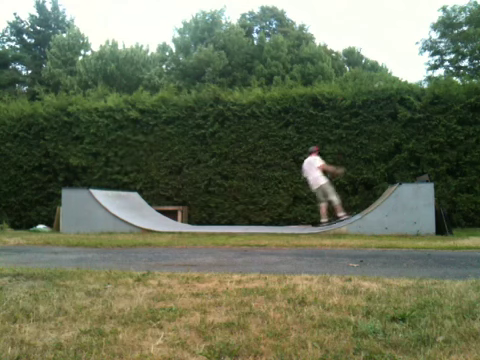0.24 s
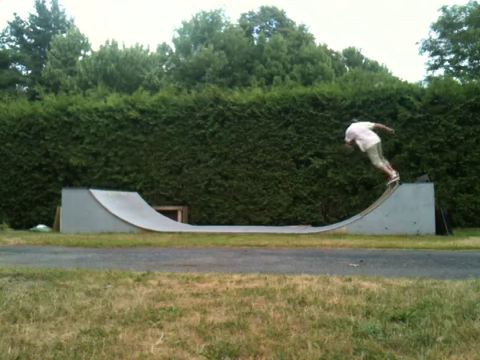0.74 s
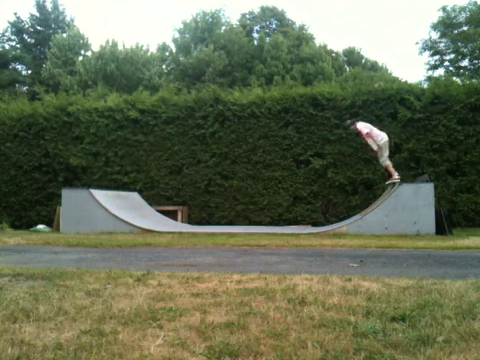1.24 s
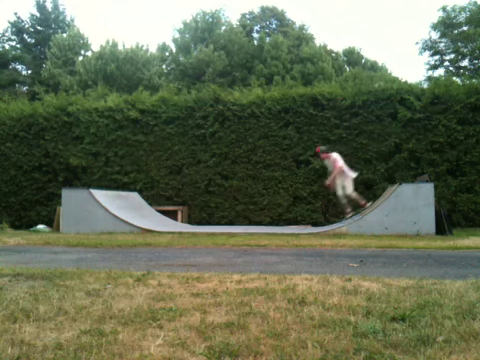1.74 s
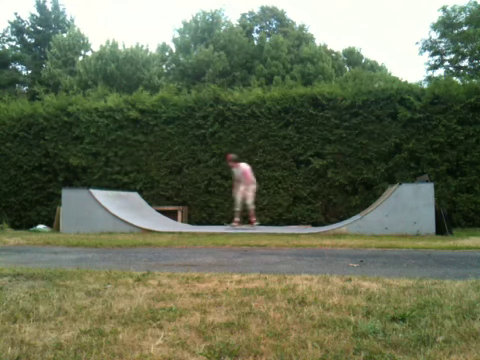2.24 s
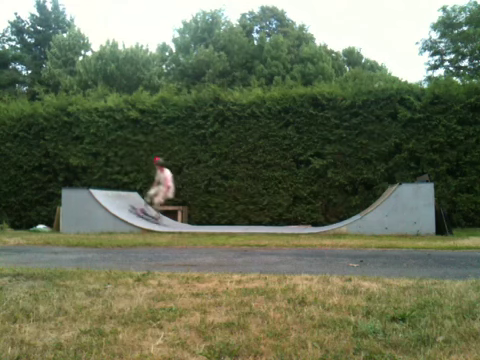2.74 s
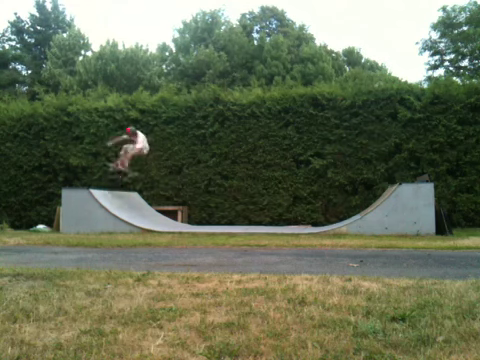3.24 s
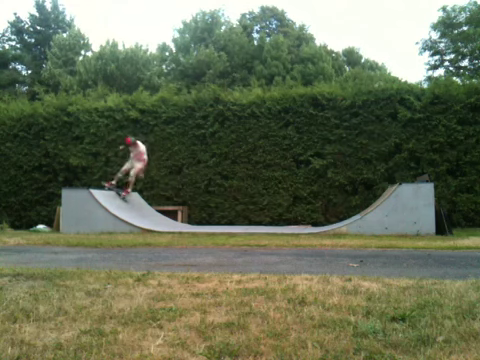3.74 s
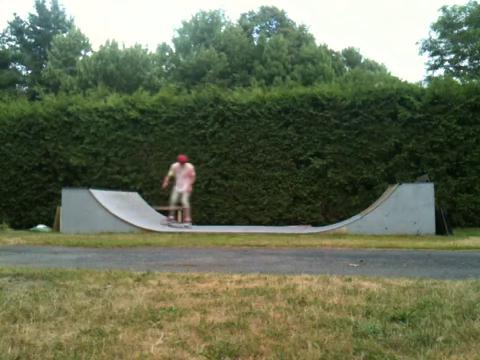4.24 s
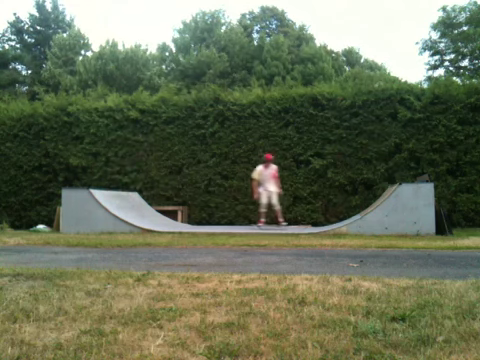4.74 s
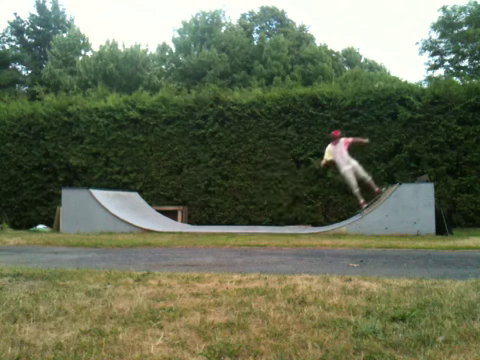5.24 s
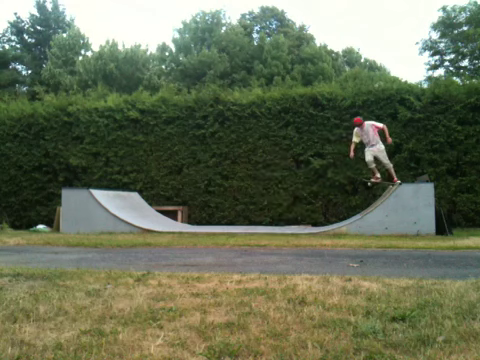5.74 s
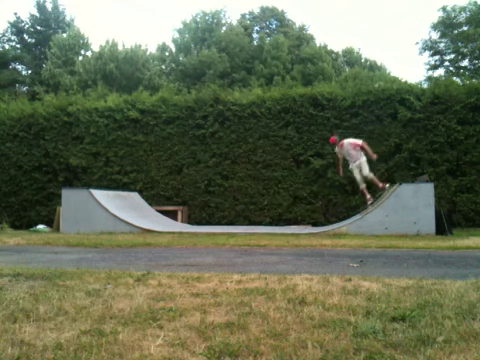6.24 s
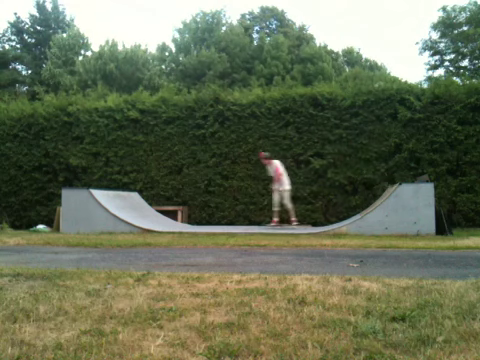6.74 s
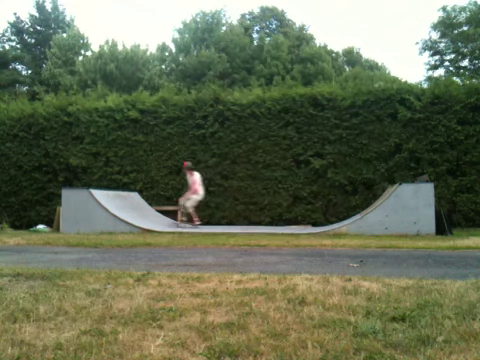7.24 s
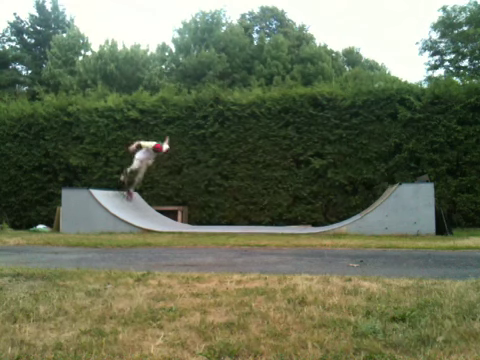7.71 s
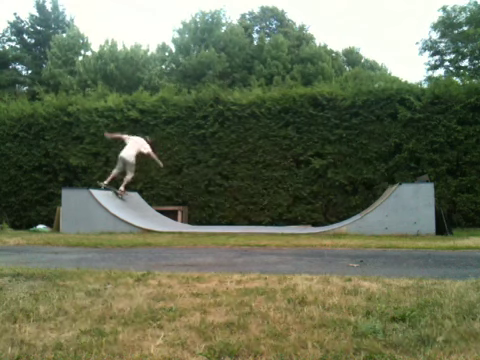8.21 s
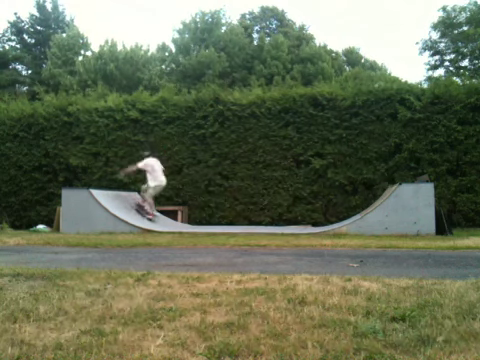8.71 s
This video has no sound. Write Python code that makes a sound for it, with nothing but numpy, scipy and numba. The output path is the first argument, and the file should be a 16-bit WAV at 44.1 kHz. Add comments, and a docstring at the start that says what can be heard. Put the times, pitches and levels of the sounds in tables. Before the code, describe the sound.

Heard from some way off in a garden, skateboard wheels rumble, hiss and thud over a hollow plywood ramp. Clacks at one lip give way to another run, then harder cracks, the loudest around four seconds. More rolling and knocks follow, a thin bird call, and a final long cluster of clattering blows. Faint traffic and leaves continue beneath.

```python
"""A skateboard rolls to and fro on a plywood mini ramp in a garden, heard from some way off.
First its wheels rumble the hollow ramp, hiss on its skin and thud over seams. Then blows clack at the lip.
More runs and blows follow, the hardest blow near 4 s; some scrape, and thin, flickering tones ring in places.
A bird calls with two thin whistles just after 6 s, then a last run ends in a long spell of blows from 7.5 s.
A hedge adds a faint tail to blows and scrapes; distant traffic and leaves are heard throughout."""
import sys
import numpy as np
from scipy import signal
from scipy.fft import rfft, irfft
from scipy.io import wavfile
from scipy.ndimage import uniform_filter1d
from numba import njit

SR = 44100
rng = np.random.default_rng(int(sys.argv[2]) if len(sys.argv) > 2 else 0)


def log_audio(samples):
    """Write samples as a 16-bit WAV file to the path given in sys.argv[1]."""
    # one column per channel
    frames = np.atleast_2d(samples).T
    # limit to full scale, then quantise
    limited = np.clip(frames, -1, 1)
    pcm = np.round(limited * 32767).astype(np.int16)
    wavfile.write(sys.argv[1], SR, pcm)


N = 395568
T = np.arange(N) / SR  # time [s]

# Runs from lip to lip: (foot of the curve going down [s], rumble [dB],
# on the flat between the curves [s], rumble [dB], foot of the curve going up [s], rumble [dB],
# wheel hiss there [dB], wheels leave the wood this long after the curve [s],
# hiss of wheels spinning free [dB]); the last row only fills the time after 8.56 s
RUNS = [(-0.6, -42, 0.093, -46.5, 0.55, -38, -54.5, 0.44, -69),
        (1.85, -39.5, 2.32, -50, 2.89, -39.5, -53, 0.24, -60),
        (4.259, -43, 4.76, -49.5, 5.17, -41, -56.5, 0.4, -64.5),
        (6.51, -43, 6.99, -47.5, 7.5, -42, -53.5, 0.39, -60.5), (8.8, -57, 7.1, -47, 14, -45, -57, .3, -67)]
# The board rocks on the lip: (time [s], rumble [dB], wheel hiss [dB])
LIP_ROCKS = [(3.77, -49, -63), (4.0, -66, -79), (8.29, -54.5, -63), (8.55, -55, -66)]
# Wheels cross a seam or rib of the ramp: (time [s], peak [dB], pitch of the panel [Hz])
SEAM_THUDS = [(0.291, -42, 188), (0.334, -38, 234), (0.416, -31, 263), (0.475, -40, 283), (0.491, -28, 261),
              (0.516, -32, 167), (0.577, -31, 170), (0.683, -40, 210), (0.764, -39, 175), (1.829, -34, 172),
              (1.874, -33, 186), (1.915, -30.5, 180), (1.949, -36, 159), (2.049, -35, 339),
              (2.164, -44, 198), (2.413, -41, 186), (2.766, -32, 151), (2.846, -29.5, 148),
              (2.879, -42, 183), (4.244, -33.5, 268), (4.323, -34, 217), (4.382, -36, 231),
              (4.634, -40, 154), (4.983, -38, 248), (5.043, -39, 215), (5.079, -36, 196), (5.133, -38, 231),
              (5.204, -34, 178), (5.259, -33, 242), (5.314, -34.5, 186.9), (5.348, -41, 194),
              (6.552, -36, 175), (7.369, -34.5, 202), (7.454, -33, 132), (7.549, -34, 248),
              (7.609, -35, 266)]
# Narrow flickering tones: a short steel ring after the blow near 0.93 s, then faint thin ones:
# (start [s], length [s], pitch [Hz], level [dB])
THIN_TONES = [(0.935, 0.09, 4800, -51), (1.02, 0.26, 4660, -72), (1.442, 0.14, 4600, -74),
              (5.46, 0.91, 6330, -74.5), (5.614, 0.77, 3430, -76.5), (5.9, 0.21, 4770, -76),
              (5.893, 0.4, 9300, -73), (7.912, 0.092, 6420, -61)]
# Blows of board and axles: (time [s], crack peak [dB], crack pitch [Hz], ramp thump [dB],
# pitch of the struck panel [Hz], sizzle [dB], clatter [dB], time for the clatter to fall 60 dB [s]);
# thump and sizzle are peaks relative to the crack, clatter is relative to the start of the push
BLOWS = [(0.616, -38, 1690, 14, 182, 0.5, 2, 0.042), (0.647, -33.5, 1730, 1, 187, 1, -6, 0.13),
         (0.747, -46.5, 1510, 10, 220, -11, -18, 0.1), (.778, -47, 1700, 0, 200, -20, -5, .08),
         (0.8, -37.5, 1500, -9, 180, -2.5, -8, 0.21), (0.8316, -38, 1740, -12, 200, -14, 5, .2),
         (.905, -27, 3420, -9, 182, -4.5, 2, 0.12), (.935, -22, 5460, -11.5, 183, -11, 5, 0.16),
         (1.0202, -39, 1810, -14, 253, -5, -7.5, 0.33), (1.3962, -49.5, 4500, -7, 200, 0, -3, 0.12),
         (1.665, -49, 1700, 17, 180, 2, -6, 0.33), (1.6952, -33.5, 2810, 7, 272, -4, 1, 0.25),
         (1.704, -26.5, 3580, 1.5, 250, -18, -10, 0.23), (1.7247, -32.5, 2180, 2, 268, -3, 0, 0.19),
         (1.7337, -35, 1540, 14, 265, -10, -6, 0.12), (2.6833, -37.5, 1510, 0, 200, -15, -17, 0.39),
         (2.834, -43, 2600, 4.5, 170, -12, -8, 0.1), (2.842, -34.5, 3800, -2, 170, -10, -7, 0.14),
         (2.918, -33.5, 3000, -21, 200, -25, -6, 1), (3.0183, -20.5, 2970, -11.5, 342, -4, -8.5, 0.25),
         (3.088, -18.5, 3940, -11.5, 150, -23, -8, 0.14), (3.0984, -38.5, 4600, -5, 160, -2, 2, 0.21),
         (3.349, -27, 4860, -8, 460, -15, -11, 0.095), (3.358, -35, 2100, -11, 401.8, 0.5, 4, 0.24),
         (3.519, -13.5, 2830, -7.5, 272, -3.5, 0, 0.2), (3.531, -22.5, 1480, -3.5, 330, -13, 1, 0.24),
         (3.87, -26, 2650, -12, 251, -16, -4, 0.1), (3.876, -26.5, 1810, -2, 200, -2, -9.5, 0.23),
         (4.0759, -12.5, 3970, -14, 262, -9, -11.5, 0.23),
         (4.0794, -6.5, 3800, -16.5, 226, -12, -13.5, 0.083), (4.0787, -17, 1780, -32, 340, -30, -12, .08),
         (4.0855, -14, 5050, -10, 298, -20, -8, 0.04), (4.0914, -26, 1490, -4.5, 294, -22, -11, 0.48),
         (5.495, -55.5, 704, 16, 301, -30, -10, 0.13), (5.526, -46.5, 1800, 2.5, 300, -5, -8, 0.14),
         (5.5499, -39, 1960, -10, 250, -21, -11, 0.26), (5.577, -39, 2170, -11, 250, -30, -1.5, 0.11),
         (6.3317, -20.5, 2550, -1, 400, -22, -16, 0.1), (6.3351, -17.5, 3030, -2.5, 384, -18, -10.5, 0.1),
         (6.357, -28, 3000, 1.5, 298, -7, 7, 0.17), (6.3625, -24.5, 1830, -5, 292, -14, -6.5, 0.21),
         (7.497, -43.5, 4500, 3, 200, -4, 10, 0.46), (7.59, -37, 4000, 0, 200, -16, -6, 0.14),
         (7.7059, -35.5, 2290, -5.5, 200, 0, -4.5, 0.19), (7.797, -34, 3260, -12, 199, -11, -6, 0.29),
         (8.0224, -12, 3750, -10.5, 427, -17, -8.5, 0.15), (8.0268, -14, 4600, -26, 180, -5, -9.5, 0.085),
         (8.0342, -25.5, 1180, -2, 150, -27, -11, 0.16), (8.0579, -11.5, 7040, -15, 130, -6.5, -9, 0.085),
         (8.061, -22.5, 2610, -8, 130, -18, 1, 0.11), (8.0694, -18.5, 4750, -25, 160, -21, -7.5, 0.1),
         (8.0899, -28.5, 2020, -1.5, 190, -0.5, -8, 0.22), (8.161, -46, 7000, -15, 200, 8.5, -6, 0.073),
         (8.239, -41, 3800, -18, 200, -22, -4, .15), (8.2888, -49.5, 8130, -15, 200, 6, -6, 0.18),
         (8.332, -31.5, 3100, -3, 500, -12, -7, 0.21), (8.3402, -38.5, 1330, -3, 500, -4.5, 5, 0.12),
         (8.4285, -33.5, 3200, 0.5, 500, -1, -4, 0.19), (8.4406, -15.5, 4070, -8.5, 198, -32, -14, 0.21),
         (8.64, -28.5, 4000, 8, 150, -3, 1, 0.072), (8.6528, -8.5, 4000, -10, 163, -13, -13.5, 0.23),
         (8.74, -47, 7950, -6, 202, -1, 10, 0.089), (8.957, -44, 5500, -12, 200, -3, -3, .1)]
# The board slides near the lip, or its wheels skid in the curve going up (the row near 7.49 s): # (start [s],
# length [s], level [dB], sizzle [dB], steel [dB]); the last two are relative to the level
SCRAPES = [(0.909, 0.05, -46, 4, -2), (3.024, 0.022, -45, -17, -19), (3.519, 0.082, -34.5, -2, -18),
           (3.703, 0.079, -60.5, 12, -11), (6.339, 0.037, -41, -9, -29), (7.493, 0.19, -49.5, -23, -12),
           (7.783, 0.066, -53, 0, -30.5), (8.049, 0.038, -34, -11, -22)]
# Resonances of the hollow plywood ramp: (pitch [Hz], width [Hz], strength [dB])
RAMP_MODES = [(101.6, 45, -3), (123.2, 40, 0.5), (150.6, 55, 0.5), (206, 41.7, -1), (248.2, 43, -4),
              (341, 99, -6), (414, 67, -4.5), (533, 122, -6.5)]
# Resonances of the board: (pitch [Hz], width [Hz], strength [dB])
DECK_MODES = [(755, 97, 7), (1178, 56, 7), (1330, 150, 4.5), (1860, 750, -1), (2547, 120, -6.5)]
# Resonances of hard contact: (pitch [Hz], width [Hz], strength [dB])
CRACK_MODES = [(1600, 1450, -1.5), (2220, 720, 7), (3130, 420, 9), (3980, 400, 8), (4460, 970, 6),
               (5290, 1120, 7.5), (5900, 4200, 1)]
# Bright top of the contact noise: (pitch [Hz], width [Hz], strength [dB])
SIZZLE_MODES = [(6900, 5600, -5), (11800, 2900, -1.5), (13150, 5700, -8.5)]
# Resonances of steel axles and bearings: (pitch [Hz], width [Hz], strength [dB])
STEEL_MODES = [(3280, 81, -7), (4600, 340, 17), (5540, 600, 8), (6970, 60, -16), (7570, 69, -16),
               (9520, 57, -12), (11450, 1900, 19)]
# Colour of the wheel hiss: (frequency [Hz], relative strength per Hz [dB])
WHEEL_COLOUR = [(290, -12.5), (520, 1.5), (680, -6), (950, -10), (1450, -10), (1800, -4.5), (2150, -9),
                (2500, -12.5), (4660, -11), (11500, -16.5), (16000, -22)]
# Bird call with two voices: (time [s], low voice [Hz], high voice [Hz], level of each [dB])
BIRD_CALL = [(6.12, 8500, 9500, -94), (6.15, 8000, 8800, -70), (6.19, 7760, 8600, -67),
             (6.26, 7900, 8600, -66), (6.31, 8100, 8800, -71), (6.34, 8300, 8800, -97)]
# Colour of traffic and leaves: (frequency [Hz], relative strength per Hz [dB])
GARDEN_COLOUR = [(18, -61), (30, -5.5), (227, -1.5), (266, -18), (600, -9.5), (988, -3.5), (1630, -11),
                 (2300, -20.5), (2700, -23), (3580, -32), (4780, -29), (5170, -28), (10300, -39),
                 (11600, -31), (16000, -39)]

# Rolling
DROP_S, ROCK_S = 0.24, 0.29  # from the lip to the foot of the curve; swell and fade of a rock
CURVE_S = 0.057  # half the time that the full weight lasts in the curve going up
REST_DB = -58.5  # rumble gain under a rider who stands on the lip
HISS_DOWN_DB, HISS_FLAT_DB = -54, -58.5
HISS_LATE_S = 0.035  # going up, the hiss peaks after the rumble
SPIN_DOWN_DB_S = 9  # free wheels slow down: loss per second
# middle pitch of the panel under the wheels at rest level, its wander, and how it rises with the load
PANEL_HZ, PANEL_OCTAVES, STIFFEN = 189.4, 0.32, 0.069
THUD_PUSH_S, THUD_SHAKE_S = 0.00045, 0.019  # time scale of the push and of the shudder
# Blows
RISE_S, GLANCE_SHARE = 0.0011, 0.49  # rise at 0 dB clatter; more clattery, glancing blows start softer
CONTACT_WIDTH = 0.7  # as a share of the crack pitch
PANEL_DB_OCTAVE = 6  # loss of ramp modes one octave from the struck panel's pitch; grows with the square
# deck knock against the crack: harder under weight, less when bright steel strikes
KNOCK_DB, KNOCK_SHARE, KNOCK_DB_OCTAVE = -4.5, 0.18, -7
USUAL_HZ = 2500  # crack pitch that leaves the knock unchanged
STEEL_DB = -18  # peak ring of the axles, relative to the crack
SCRAPE_FADE_S = 0.036  # a scrape dies away after the slide
# Background and microphone
GARDEN_DB = -59.5
TOP_HZ = 16000


def undb(db):
    """Turn decibels into a plain multiplier."""
    return 10 ** (np.asarray(db) / 20)


def level(x, db):
    """Scale to an average (rms) level."""
    return x * undb(db) / np.sqrt(np.mean(x ** 2))


def peak(x, db):
    """Scale to a peak level."""
    return x * undb(db) / np.max(np.abs(x))


@njit
def resonator(x, hz, width):
    """Band-pass made of two linked stores, like a body that rings at one pitch; gain 1 at the centre."""
    y, band, low = np.empty(len(x)), 0., 0.
    g, k = np.tan(np.pi * hz / SR), width / hz
    for i in range(len(x)):
        v = (band + g * (x[i] + 1e-18 - low)) / (1 + g * (g + k))
        band, low, y[i] = 2 * v - band, low + 2 * g * v, k * v
    return y


def ring(x, modes, shake=lambda f: 1):
    """A body's resonances added up; shake(f) sets how strongly each one is driven."""
    total = 0
    for k, (hz, width, db) in enumerate(modes):
        sign = (-1) ** k  # neighbours in the table have opposite signs
        total = total + sign * undb(db) * resonator(x * shake(hz), 1. * hz, 1. * width)
    return total


def coloured(points):
    """Noise with a spectrum given as (Hz, dB), rms 1."""
    hz, db = np.transpose(points)
    f = np.maximum(np.fft.rfftfreq(N, 1 / SR), 1)
    gain = undb(np.interp(np.log(f), np.log(hz), db))
    return level(irfft(rfft(rng.standard_normal(N)) * gain, N), 0)


def walk(rate):
    """Random levels, rate of them per second, smoothed twice; spread near 1."""
    k = int(SR / rate)
    steps = np.repeat(rng.standard_normal(N // k + 1), k)
    return 1.13 * uniform_filter1d(uniform_filter1d(steps, k), k)[:N]


def grit(rate, scatter_db):
    """Random clicks of very unequal size, about rate per second, rms 1."""
    hits = rng.random(N) < rate / SR
    sizes = rng.standard_normal(N) * undb(scatter_db * rng.exponential(size=N))
    return level(hits * sizes, 0)


def spot(f):
    """Every blow lands on another spot, which favours other modes."""
    return undb(2.6 * rng.standard_normal())


def wheel_levels():
    """Gains of rumble and hiss: the rider's weight presses hardest in the two curves, lifts off at the lip."""
    rumble, hiss = [], []
    next_downs = [run[0] for run in RUNS[1:]] + [11]
    for run, next_down in zip(RUNS, next_downs):
        down, down_db, flat, flat_db, up, up_db, hiss_db, climb, spin_db = run
        lip = up + CURVE_S + max(climb, HISS_LATE_S)
        leave = next_down - DROP_S
        rumble += [(down - DROP_S, REST_DB), (down, down_db), (flat, flat_db),
                   (up - CURVE_S, up_db), (up + CURVE_S, up_db), (lip, REST_DB)]
        hiss += [(down, HISS_DOWN_DB), (flat, HISS_FLAT_DB), (up + HISS_LATE_S, hiss_db),
                 (lip, spin_db), (leave, spin_db - SPIN_DOWN_DB_S * (leave - lip))]
    rumble = undb(np.interp(T, *np.transpose(rumble)))
    hiss = undb(np.interp(T, *np.transpose(hiss)))
    for s, rumble_db, hiss_db in LIP_ROCKS:
        swell = np.exp(-((T - s) / ROCK_S) ** 2)
        rumble = np.hypot(rumble, undb(rumble_db) * swell)
        hiss = np.hypot(hiss, undb(hiss_db) * swell)
    return rumble, hiss


def rolling():
    """Bumps in the plywood shake the ramp; the wheels hiss; spinning bearings rattle the steel."""
    rumble, hiss = wheel_levels()
    panel_hz = PANEL_HZ * 2 ** (PANEL_OCTAVES * walk(3.56)) * (rumble / undb(REST_DB)) ** STIFFEN
    bumps = rng.standard_normal(N)
    lumps = undb(1.7 * walk(35))  # ribs and seams pass under the wheels

    def under_wheels(f):
        """Modes near the pitch of the panel under the wheels are driven hardest, each unevenly."""
        return undb(2.34 * walk(14) - 3.8 * np.log2(f / panel_hz) ** 2)

    panels = ring(bumps, RAMP_MODES, under_wheels)
    ramp = level(lumps * resonator(panels, 180.0, 830.0), -2.37)
    deck = level(ring(grit(3000, 1.6), DECK_MODES, lambda f: undb(2.2 * walk(11))), -14.5)
    wheels = undb(2.0 + 1.4 * walk(18)) * coloured(WHEEL_COLOUR)
    bearings = level(ring(grit(1400, 2.1), STEEL_MODES, lambda f: undb(1.3 * walk(15.0))), -15.5)
    return rumble * (ramp + deck) + hiss * (wheels + bearings)


def thuds():
    """A short soft push and a shudder ring the panels around the seam."""
    out, t = np.zeros(N + SR), T[:SR // 6]
    for s, db, panel_hz in SEAM_THUDS:
        push = t / THUD_PUSH_S * np.exp(-t / THUD_PUSH_S)
        shudder = 0.39 * rng.standard_normal(len(t)) * np.exp(-t / THUD_SHAKE_S)
        panel = lambda f: spot(f) * undb(-12.0 * np.log2(f / panel_hz) ** 2)
        i = int(s * SR)
        out[i:i + len(t)] += peak(ring(push + shudder, RAMP_MODES, panel), db)
    return out[:N]


def thin_tones():
    """Narrow, flickering bands of fine rattle, each at one pitch."""
    out, rattle = np.zeros(N), grit(5000, 1.2)
    share = .045  # width as a share of the pitch
    for s, length, hz, db in THIN_TONES:
        times = [s, s + 0.14 * length, s + 0.73 * length, s + length]
        shape = np.interp(T, times, [0.015, 0.91, 0.92, 0.014])
        flicker = undb(1.6 * walk(30))
        out += shape * level(resonator(rattle * flicker, 1. * hz, share * hz), db)
    return out


def blows():
    """Each blow is a click, then a ragged clatter that builds and dies, ringing contact, ramp, deck and steel."""
    out, t, ragged = np.zeros(N + SR), T[:SR // 3], undb(2.03 * walk(300))
    for s, db, hz, thump_db, panel_hz, sizzle_db, clatter_db, t60 in BLOWS:
        i, noise = int(s * SR), rng.standard_normal((5, len(t)))
        rise = RISE_S * undb(GLANCE_SHARE * clatter_db)
        snap = (t / .0001) * np.exp(1 - t / .0001)
        shove = (t / 0.0021) * np.exp(1 - t / 0.0005)  # the heavy ramp feels a longer, smooth push
        clatter = undb(clatter_db - 60 * t / max(t60, .01)) * np.resize(ragged[i:], len(t))
        push = (3.4 * np.exp(-t / (1.09 * rise)) + clatter) * (1 - np.exp(-t / rise)) * noise
        # a slow contact has little click
        click = np.gradient(snap) * 0.0088 / rise + push[0]
        contact = [(hz, CONTACT_WIDTH * hz, 0)]
        crack = ring(ring(click, contact), contact)
        crack = crack + undb(-8.0) * ring(push[1] * undb(-60 * t), CRACK_MODES, spot)
        # the top dies first
        sizzle = ring(ring(push[4] * undb(-100 * t), SIZZLE_MODES), [(9700, 37000, 0)])
        panel = lambda f: spot(f) * undb(-PANEL_DB_OCTAVE * np.log2(f / panel_hz) ** 2)
        thump = ring(shove + 1.87 * push[2] * undb(17 * t), RAMP_MODES, panel)
        knock = ring(snap + push[3], DECK_MODES, spot)
        knock_db = KNOCK_DB + KNOCK_SHARE * thump_db + KNOCK_DB_OCTAVE * np.log2(hz / USUAL_HZ)
        steel = ring(push[4], STEEL_MODES, spot)
        blow = peak(crack, 0) + peak(thump, thump_db) + peak(knock, knock_db)
        blow += peak(sizzle, sizzle_db) + peak(steel, STEEL_DB)
        out[i:i + len(t)] += undb(db) * blow
    return out[:N]


def scrapes():
    """Axles or wheels slide, sticking and slipping in dense clicks that ring wood and steel."""
    drag = np.zeros((3, N))  # gains of wood, sizzle and steel
    for s, length, db, sizzle_db, steel_db in SCRAPES:
        end = s + length
        slide = np.interp(T, [s, s + 0.62 * length, end], [0.0032, 0.91, 0.41]) * (T > s)
        fade = 0.36 * np.exp(-np.maximum(T - s - length, 0) / SCRAPE_FADE_S)
        shape = np.where(T > end, fade, slide)
        drag += np.outer(undb(db + np.array([0, sizzle_db, steel_db])), shape)
    slips = grit(3500, 1.6) * undb(1.1 * walk(200))
    # the sliding contact moves over the body and favours changing modes
    wander = lambda f: undb(4.3 * walk(40))
    wood = level(ring(slips, CRACK_MODES, wander), 0) + level(ring(slips, DECK_MODES, wander), 0)
    sizzle = level(ring(slips, SIZZLE_MODES), 0)
    steel = level(ring(slips, STEEL_MODES), 0)
    return drag[0] * wood + drag[1] * sizzle + drag[2] * steel


def surroundings(x):
    """Hedge and trees return a faint, dull, diffuse tail."""
    t = T[:SR // 2]
    fade = undb(-60 * t / 0.63)  # falls 60 dB in 0.63 s
    reply = undb(-48.0) * resonator(rng.standard_normal(len(t)), 1330.0, 3600.0) * fade
    return x + signal.fftconvolve(x, reply)[:N]


def bird():
    """Two wavering whistles at once, fluttering in level."""
    s, *pitches, db = np.transpose(BIRD_CALL)
    voices = np.zeros(N)
    for hz in pitches:
        pitch = np.interp(T, s, hz) * (1 + 0.014 * walk(700))
        flutter = undb(3.6 * walk(100))
        voices += flutter * np.sin(2 * np.pi * np.cumsum(pitch) / SR)
    return undb(np.interp(T, s, db)) * (T > s[0]) * (T < s[-1]) * voices


def garden():
    """Distant traffic and leaves: coloured noise, swelling a little."""
    swell = undb(0.58 * walk(0.29) + 0.15 * walk(27))
    return level(coloured(GARDEN_COLOUR) * swell, GARDEN_DB)


def scene():
    """Add all sources; only blows and scrapes get the tail of the hedge."""
    board = rolling() + thuds() + thin_tones() + surroundings(blows() + scrapes())
    return (board + bird() + garden())[None]


def record(dry):
    """The small microphone loses the deep bass; the top is cut steeply."""
    thin = signal.sosfilt(signal.butter(2, 90, "high", fs=SR, output="sos"), dry)
    return signal.sosfilt(signal.ellip(10, .2, 70, TOP_HZ, fs=SR, output="sos"), thin)


dry = scene()
out = record(dry)
log_audio(out)
```